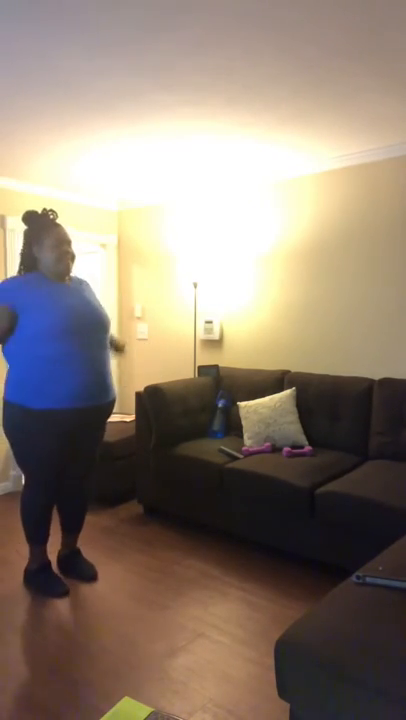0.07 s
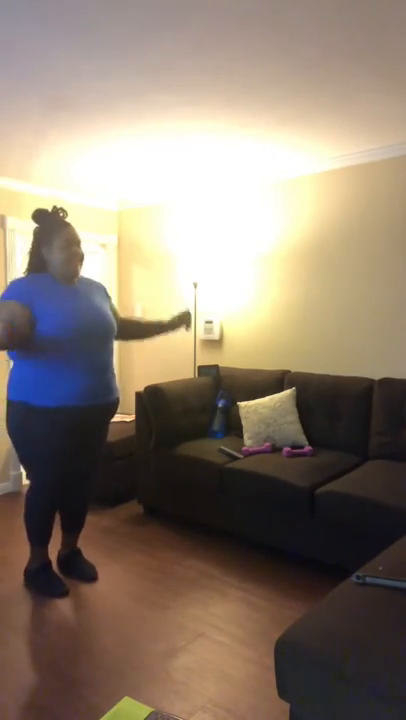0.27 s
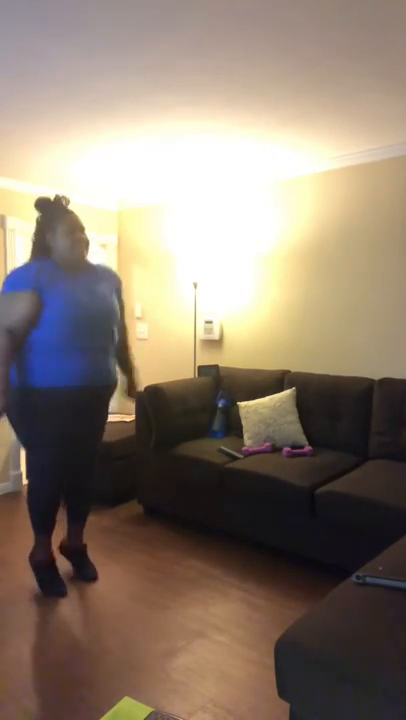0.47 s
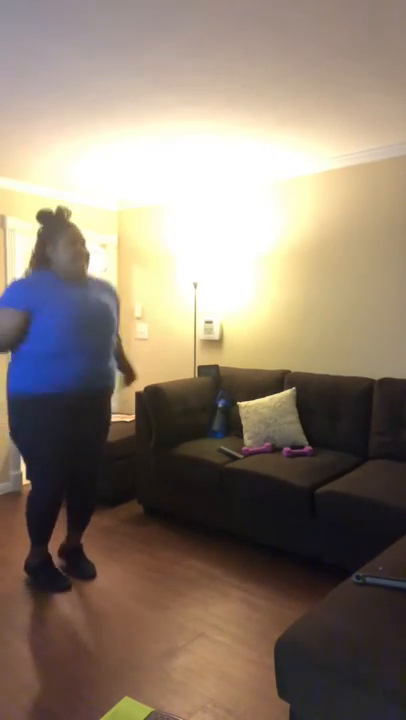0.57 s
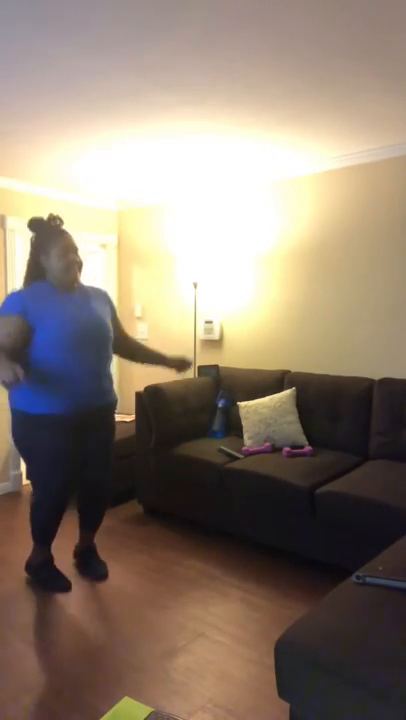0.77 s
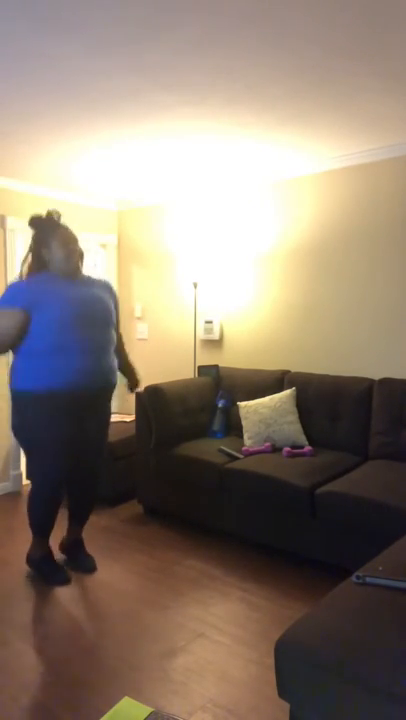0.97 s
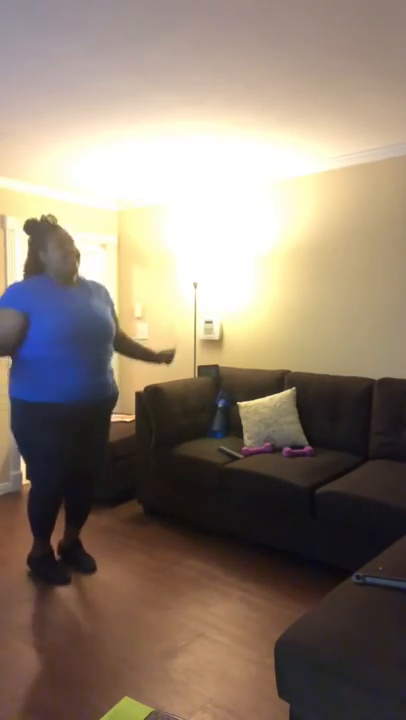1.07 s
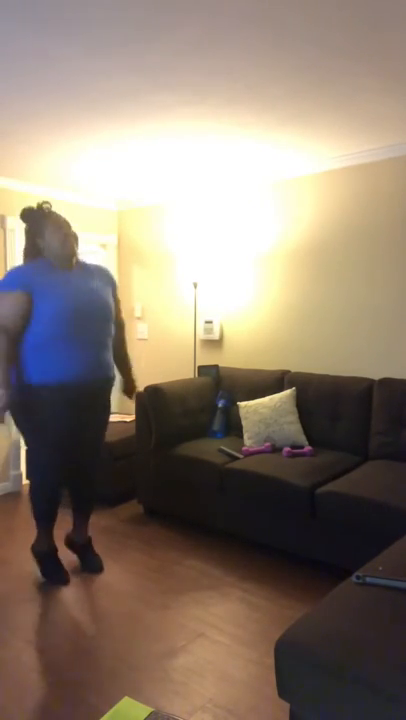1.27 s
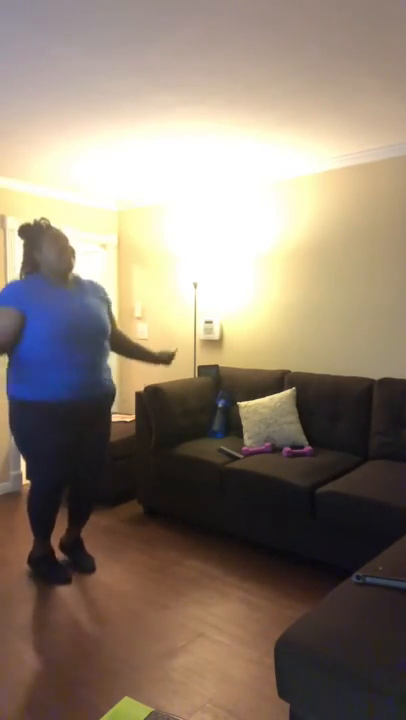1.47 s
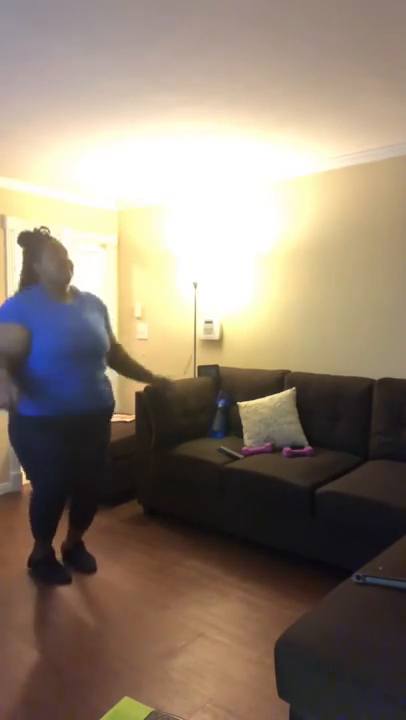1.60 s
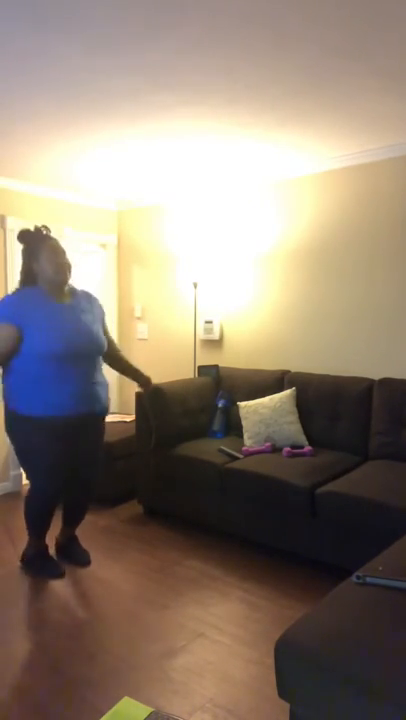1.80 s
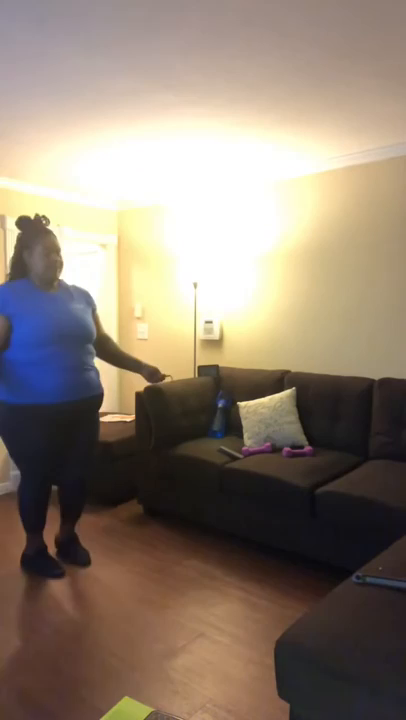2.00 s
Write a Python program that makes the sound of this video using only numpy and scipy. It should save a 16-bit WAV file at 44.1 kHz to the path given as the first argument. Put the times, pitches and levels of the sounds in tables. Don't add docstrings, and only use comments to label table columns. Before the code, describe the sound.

Jump rope slaps wooden boards four times in steady rhythm, shoes thudding lightly in a small room.

```python
import sys
import numpy as np
from scipy import signal
from scipy.fft import rfft, irfft, next_fast_len
from scipy.io import wavfile
from scipy.ndimage import map_coordinates

SR = 44100
rng = np.random.default_rng(int(sys.argv[2]) if len(sys.argv) > 2 else 0)


def makeup_ratio(level_db):
    decades = np.asarray(level_db, float) / 20
    return 10 ** decades


def to_wav(sig):
    pcm = np.clip(np.atleast_2d(sig), -1, 1) * 32767
    pcm = np.round(pcm).astype(np.int16)
    wavfile.write(sys.argv[1], SR, pcm.T)


N = 90184
SPAN = 2 ** 15

# t/s, peak level/dB, centre f/Hz, width/centre f
ROPE_CRACKS = [
    (.5455, -20.5, 10060, 2.5),
    (.5501, -23, 12000, 0.82),
    (.966, -12.5, 6930, 2.7),
    (.9663, -9, 8020, .8),
    (1.3653, -12, 6940, 1.4),
    (1.3748, -9.5, 7000, 2.1),
    (1.7677, -8, 10800, 1.58),
]


def rope():
    return contacts(ROPE_CRACKS, gain_db=0, wet_db=0.5, board_db=-36)


# t/s, peak level/dB, centre f/Hz, width/centre f
SHOE_LANDINGS = [(.6195, -29, 1650, 1.5), (.6277, -31.5, 3940, 0.96), (1.0205, -33, 1390, 2.15),
                 (1.4165, -29.5, 1480, 1.73), (1.7965, -27.5, 2990, 0.98), (.3425, -46.5, 430, 0.8),
                 (.344, -40.5, 2060, 1.13), (.356, -48.5, 537, 1.6), (1.803, -40.5, 810, 1.55),
                 (.621, -40, 790, 1.5), (1.031, -46.5, 865, 1.25), (1.229, -42, 1710, 1.64)]


def shoes():
    return contacts(SHOE_LANDINGS, gain_db=5, wet_db=3, board_db=12)


# t/s, level/dB
FLOOR_LOADS = [
    (.625, -52),
    (1.029, -50.5),
    (1.42, -48.5),
    (1.801, -56),
]


def joists():
    centre_hz, width_hz, t60_s, rise_s = 112, 37, 0.27, 0.041
    mix, t = np.zeros(N + SPAN), np.arange(SPAN) / SR
    for start_s, db in FLOOR_LOADS:
        noise = rng.standard_normal(SPAN)
        shudder = unit(filtered(noise, lambda f: peak(f, centre_hz, width_hz) ** 2))
        fade = makeup_ratio(db - 60 * t / t60_s) * (1 - np.exp(-t / rise_s))
        add(mix, start_s, fade * shudder)
    return mix[:N]


# t/s, peak level/dB, centre f/Hz, width/centre f
LIGHT_TAPS = [(0.72, -31.5, 6700, 1.1), (.8177, -33.5, 2700, 1.4), (.835, -32, 4000, 4.3),
              (1.171, -40.5, 7300, 0.55), (1, -38.5, 5100, 2.1), (1.582, -39, 2800, 2.3),
              (1.622, -43, 2000, 1.03), (1.666, -44, 8100, 1.5), (1.715, -38, 5700, 2.7),
              (1.2293, -40.5, 6700, 1.5), (1.739, -33, 2200, 3.6), (2.0025, -43.5, 2700, 1.35),
              (1.961, -43, 4000, 2.2), (.464, -50.5, 4700, 0.91), (0.74, -66, 4000, 1.3)]


def taps():
    return contacts(LIGHT_TAPS, gain_db=1.5, wet_db=3, board_db=-25)


# t/s, length/s, level/dB, centre f/Hz, width/centre f
SCUFF_STROKES = [(0.3388, 0.0099, -41.5, 5170, 0.99), (0.421, 0.29, -69.5, 4940, 3.2),
                 (0.663, 0.12, -61, 4340, 1.7), (0.848, 0.095, -61.5, 2810, 2.4),
                 (0.946, 0.017, -52, 10660, 2.2), (1.078, 0.067, -62.5, 3430, 1.6),
                 (1.167, 0.035, -54.5, 2780, 1.6), (1.268, 0.24, -63, 4140, 2.1),
                 (1.341, 0.046, -56.5, 9700, 3.9), (1.598, 0.3, -67, 2870, 2.9),
                 (1.73, 0.031, -57, 7000, 2.5), (1.876, 0.29, -64, 3495, 3.2)]


def scuffs():
    mix, t = np.zeros(N + SPAN), np.arange(SPAN) / SR
    for start_s, length, db, hz, width in SCUFF_STROKES:
        grain = makeup_ratio(1.5 * rng.standard_exponential(SPAN))
        grit = rng.standard_normal(SPAN) * grain
        grit = unit(filtered(grit, lambda f: peak(f, hz, width * hz) ** 2))
        corners_s = [0, 0.3 * length, length, 1.015 * length]
        stroke = np.interp(t, corners_s, [0.64, 0.61, 0.94, 0.0025])
        add(mix, start_s, makeup_ratio(db) * room(grit * stroke, wet_db=3))
    return mix[:N]


# t/s, level/dB
CLOTH_MOVES = [
    (0.0, -65.5),
    (0.39, -74),
    (0.52, -57.5),
    (0.6, -64.5),
    (0.74, -58),
    (1.03, -59),
    (1.62, -61),
    (1.94, -61.5),
    (2.04, -64),
]
# f/Hz, level/dB per Hz
CLOTH_COLOUR = [(100, -80), (700, 13), (1500, 5), (3000, 0.5), (8000, -12.5), (16000, -23)]


def clothes():
    s, db = np.transpose(CLOTH_MOVES)
    hiss = unit(filtered(rng.standard_normal(N), lambda f: makeup_ratio(along(CLOTH_COLOUR, f))))
    return makeup_ratio(-2 + np.interp(np.arange(N) / SR, s, db)) * hiss


# f/Hz, level/dB per Hz
FAN_COLOUR = [(40, -56), (80, -20.5), (140, -5.5), (240, -7.5), (850, -9.5), (1400, -18.5), (2500, -26),
              (16000, -38.5)]
# f/Hz, width/Hz, level/dB
DUCT_BANDS = [(150.8, 3.44, -69), (384.8, 13.4, -70), (749, 92, -65.5)]


def fan():
    rush = makeup_ratio(-60) * unit(filtered(rng.standard_normal(N), lambda f: makeup_ratio(along(FAN_COLOUR, f))))
    duct = np.zeros(N)
    for hz, width_hz, db in DUCT_BANDS:
        band = filtered(rng.standard_normal(N), lambda f: peak(f, hz, width_hz) ** 2)
        duct += makeup_ratio(db) * unit(band)
    return rush + duct


# t/s, f/Hz, level/dB
HUM_DRIFT = [
    (0, 297.6, -82),
    (.8, 304.3, -81),
    (1.101, 297.2, -62),
    (1.6, 304.3, -63.5),
    (2.04, 313.3, -66.5),
]


def appliance():
    s, hz, db = np.transpose(HUM_DRIFT)
    t = np.arange(N) / SR
    phase = 2 * np.pi * np.cumsum(np.interp(t, s, hz)) / SR
    return np.sqrt(2) * makeup_ratio(np.interp(t, s, db)) * np.sin(phase)


def contacts(rows, gain_db, wet_db, board_db):
    mix = np.zeros(N + SPAN)
    impulse = np.eye(1, SPAN)[0]
    for start_s, db, hz, width in rows:
        click = uneven(filtered(impulse, lambda f: peak(f, hz, width * hz) ** 2))
        click = click / np.abs(click).max()
        click = click + makeup_ratio(board_db) * filtered(click, boards)
        add(mix, start_s, makeup_ratio(db + gain_db) * room(click, wet_db))
    return mix[:N]


# f/Hz, width/Hz, level/dB
BOARD_MODES = [(364, 42, -8.5), (694, 105, -1), (941, 28, -1), (1143, 23, -5.5), (1395, 180, -11),
               (1895, 65, 0.5), (2116, 49, -6.5), (2324, 51, -3), (2546, 34, -6.5), (2920, 180, -2),
               (3130, 17, -23), (3840, 110, -27)]


def boards(f):
    response = 0
    for k, (hz, width_hz, db) in enumerate(BOARD_MODES):
        sign = (-1) ** k
        response = response + sign * makeup_ratio(db + rng.normal(0, 0.83)) * peak(f, hz, width_hz)
    return response


# t/s, level/dB
EARLY_ECHOES = [(.0011, -8), (.0013, -12), (.00185, -6), (.0023, -9), (.0035, -13), (.005, -14),
                (.0079, -13), (.0083, -13), (.0087, -14), (.0145, -18), (.026, -20)]
# f/Hz, t/s
TAIL_TIMES = [(300, 0.21), (1000, 0.17), (3000, 0.24), (7000, 0.22), (15000, 0.2)]


def room(x, wet_db):
    scatter_db, scatter_t60_s, tail_rise_s = -12, 0.06, 0.001
    hz, t, z = signal.stft(rng.standard_normal(SPAN // 2), SR, nperseg=128)
    fade = makeup_ratio(-60 * t / along(TAIL_TIMES, hz)[:, None])
    tail = signal.istft(z * fade, SR, nperseg=128)[1]
    t = np.arange(len(tail)) / SR
    scatter = rng.standard_normal(len(t)) * makeup_ratio(-60 * t / scatter_t60_s)
    tail = tail / np.linalg.norm(tail) + makeup_ratio(scatter_db) * scatter / np.linalg.norm(scatter)
    lumps = makeup_ratio(1.8 * wobble(900 / SR, size=len(t)))
    answer = makeup_ratio(wet_db) * tail * (1 - np.exp(-t / tail_rise_s)) * lumps
    delay, db = np.transpose(EARLY_ECHOES)
    vary = rng.standard_normal((2, len(delay)))
    at = np.round(delay * (1 + 0.02 * vary[0]) * SR).astype(int)
    answer[at] += makeup_ratio(db + 1.5 * vary[1])
    answer[0] = 1
    return signal.fftconvolve(x, answer)[:len(x)]


def uneven(x):
    ripple_db, ripple_hz = 1.5, 1000
    half = len(x) // 2
    ripple = makeup_ratio(ripple_db * wobble(SR / len(x) / ripple_hz, size=half + 1))
    cepstrum = irfft(np.log(ripple))
    cepstrum = cepstrum * np.r_[1, 2 * np.ones(half - 1), np.zeros(half)]
    return irfft(rfft(x) * np.exp(rfft(cepstrum)))


def wobble(rate, size):
    knots = rng.standard_normal(int(size * rate) + 4)
    return map_coordinates(knots, [np.arange(size) * rate])


def peak(f, centre_hz, width_hz):
    return 1j * f * width_hz / (centre_hz ** 2 - f * f + 1j * f * width_hz)


def filtered(x, response):
    m = next_fast_len(len(x) + 8192)
    return irfft(rfft(x, m) * response(np.fft.rfftfreq(m, 1 / SR)), m)[:len(x)]


def along(points, hz):
    f, v = np.transpose(points)
    return np.interp(np.log(hz + 1), np.log(f + 1), v)


def unit(x):
    return x / np.sqrt(np.mean(x ** 2) + 1e-20)


def add(mix, start_s, x):
    mix[round(start_s * SR):][:len(x)] += x


def scene():
    contact = rope() + shoes() + joists() + taps() + scuffs()
    return (contact + clothes() + fan() + appliance())[None]


def band_limit(x):
    return signal.sosfilt(signal.butter(12, 17010, fs=SR, output="sos"), x)


def record(dry):
    low_hz, top_hz, top_slope_db = 60, 15900, -0.04

    def microphone(f):
        bass_cut = (1j * f / (low_hz + 1j * f)) ** 2
        return bass_cut * makeup_ratio(top_slope_db * np.maximum(f - top_hz, 0))

    mix = filtered(dry[0], microphone)[None]
    return band_limit(mix)


dry = scene()
out = record(dry)
to_wav(out)
```